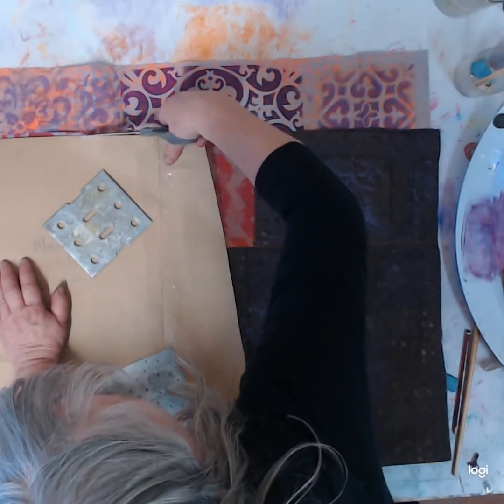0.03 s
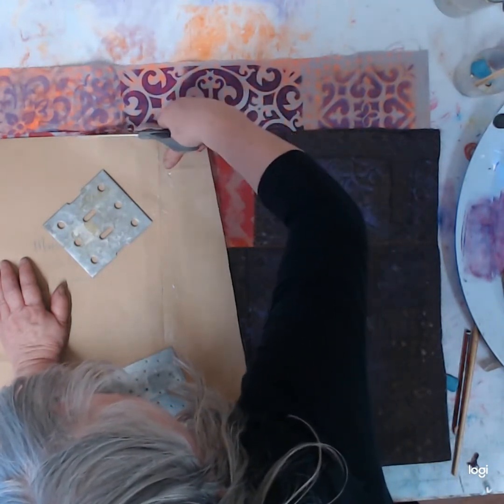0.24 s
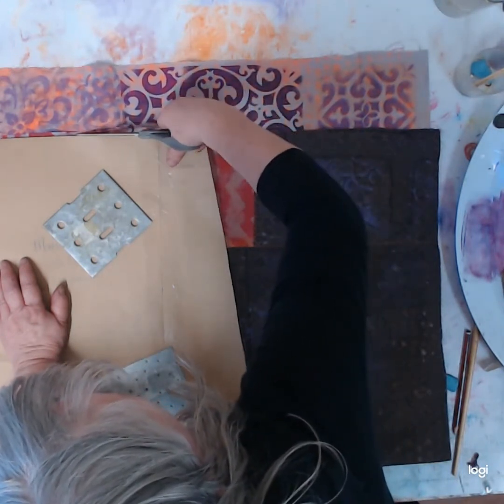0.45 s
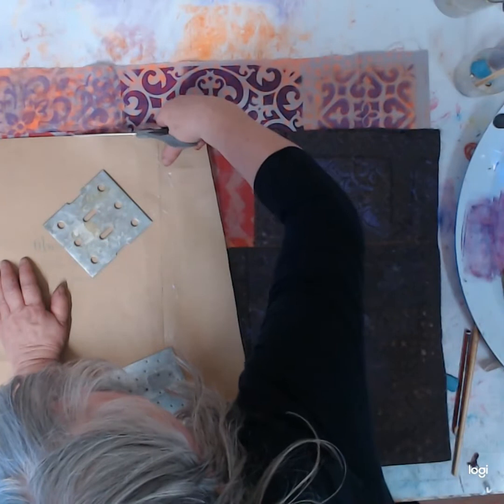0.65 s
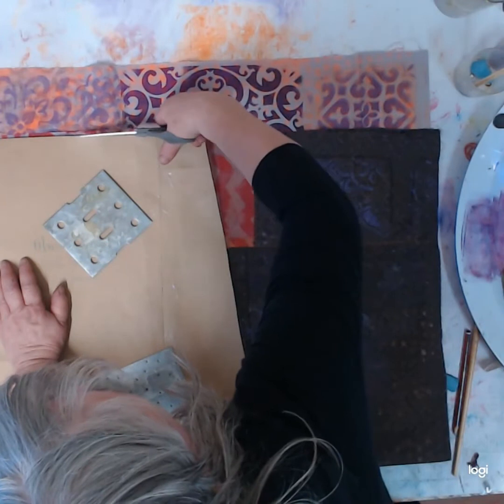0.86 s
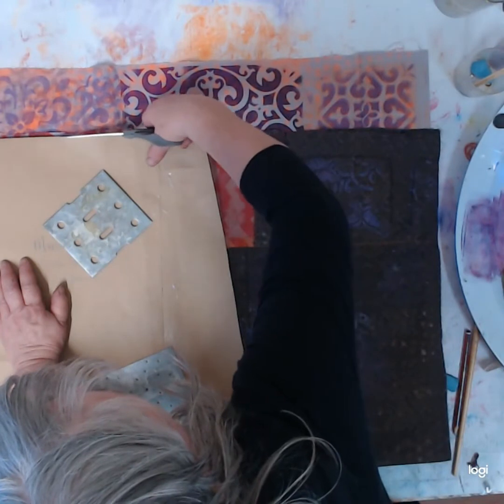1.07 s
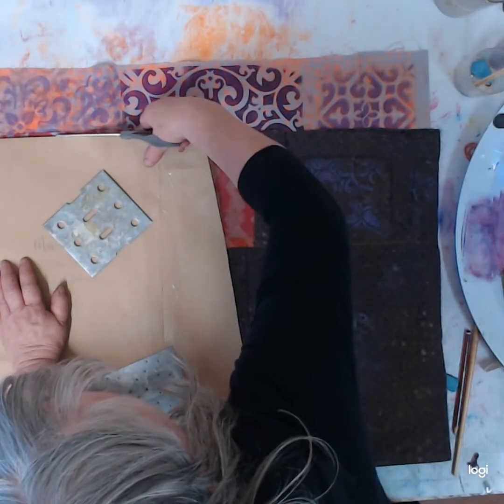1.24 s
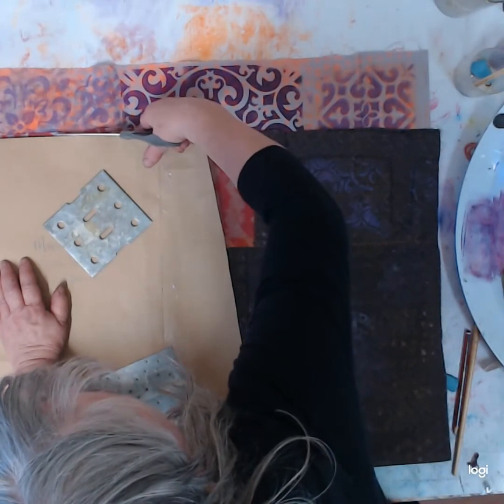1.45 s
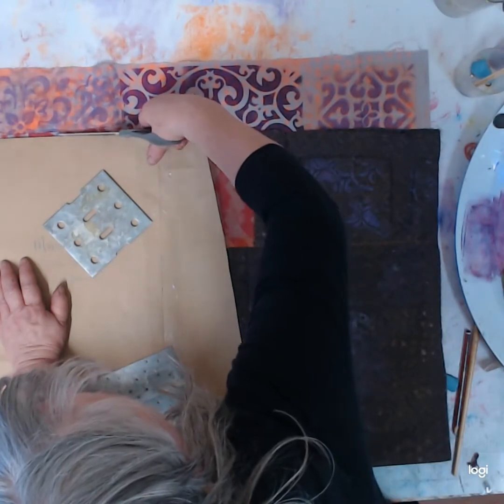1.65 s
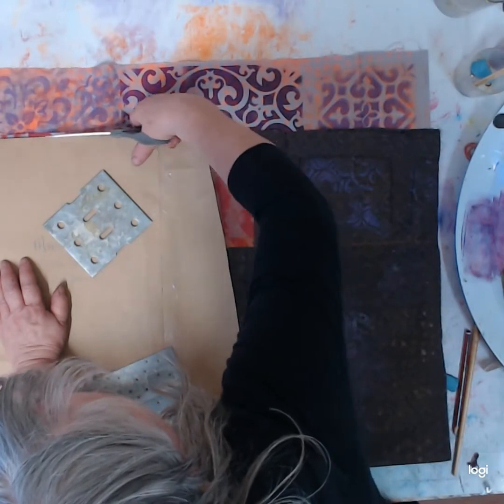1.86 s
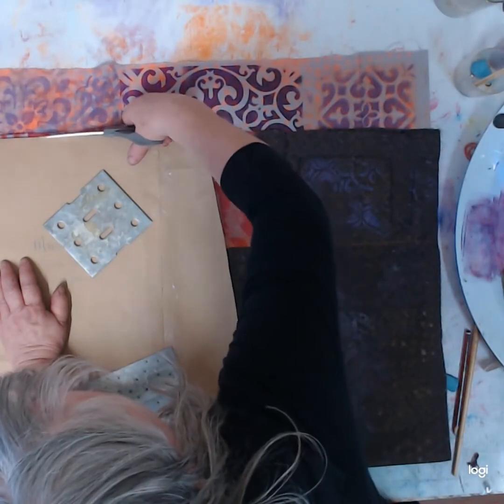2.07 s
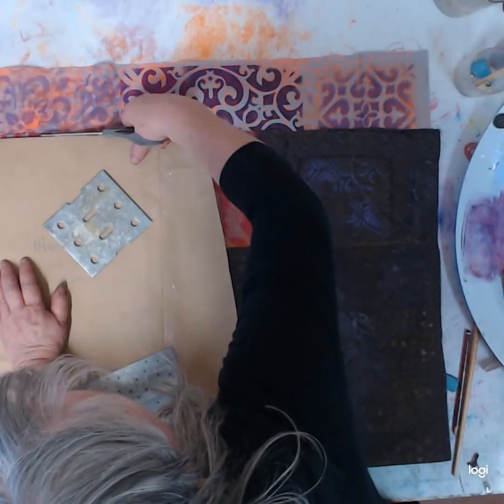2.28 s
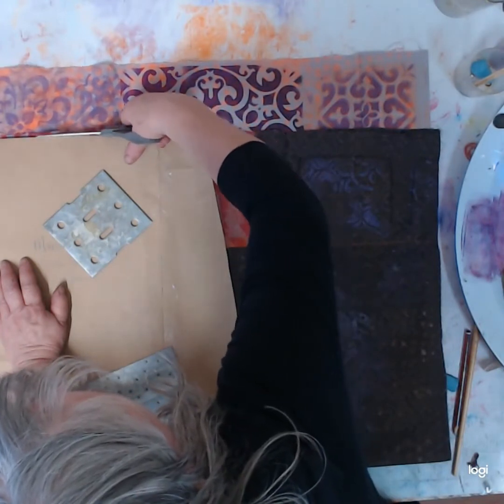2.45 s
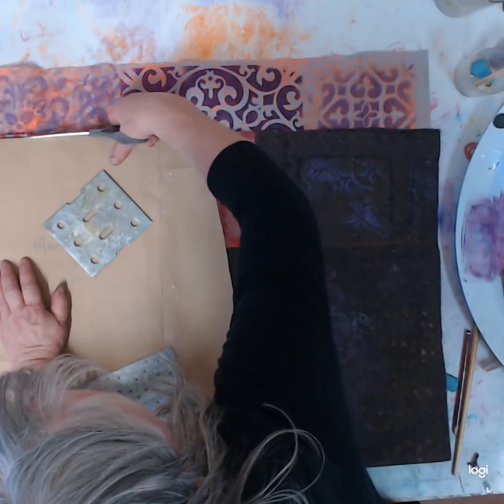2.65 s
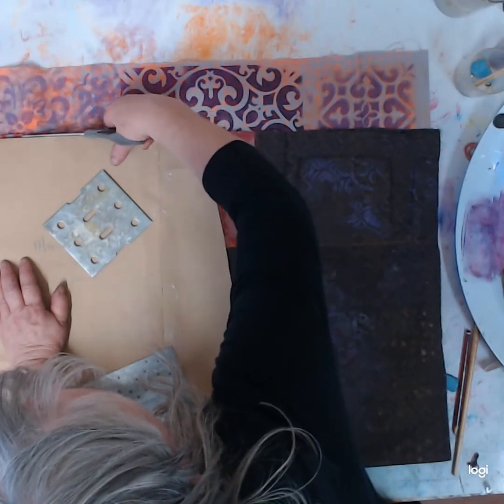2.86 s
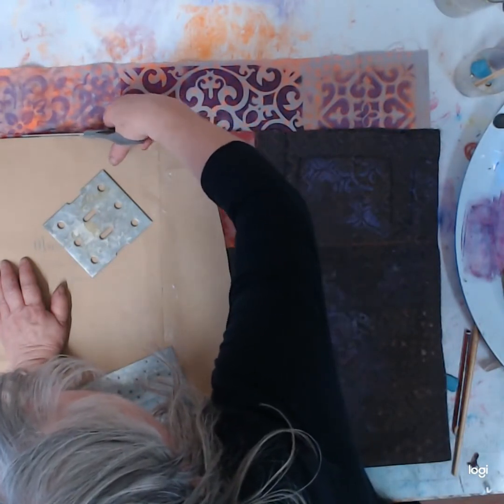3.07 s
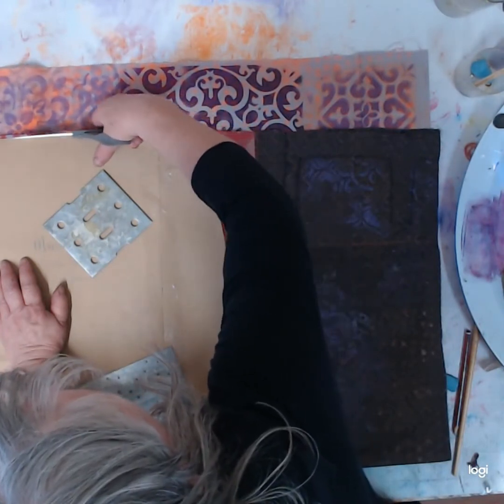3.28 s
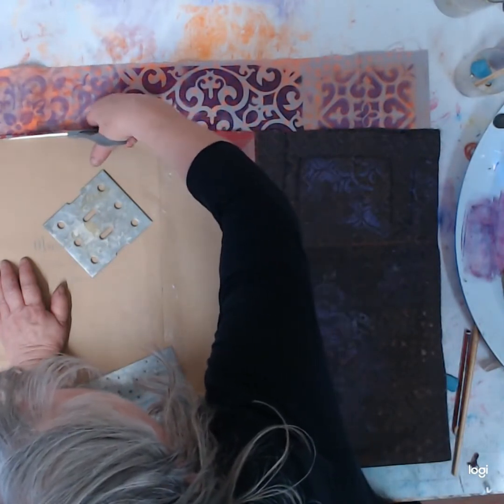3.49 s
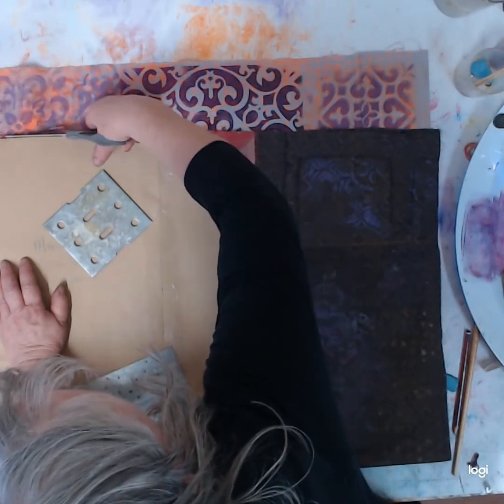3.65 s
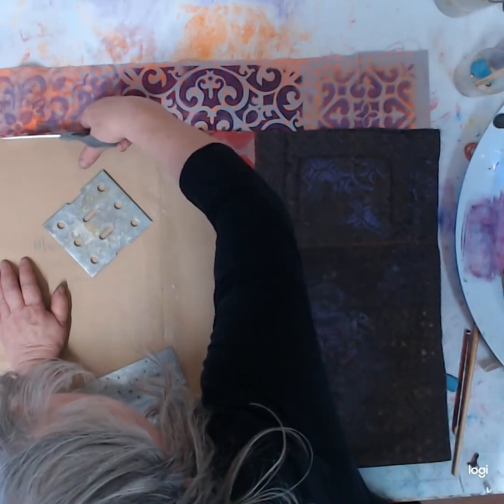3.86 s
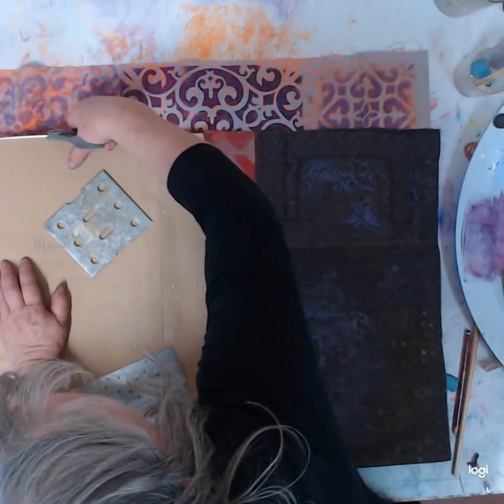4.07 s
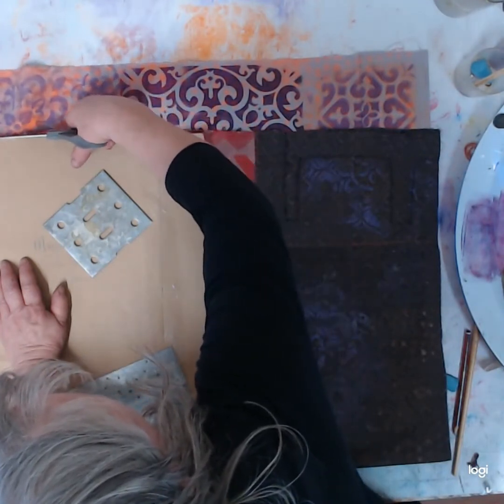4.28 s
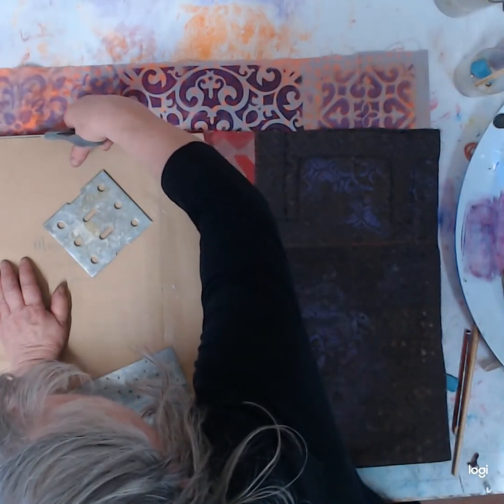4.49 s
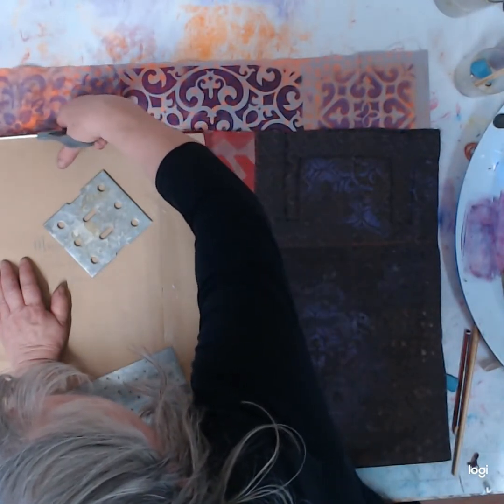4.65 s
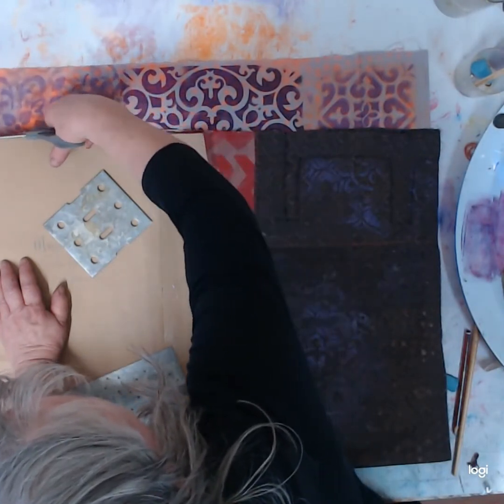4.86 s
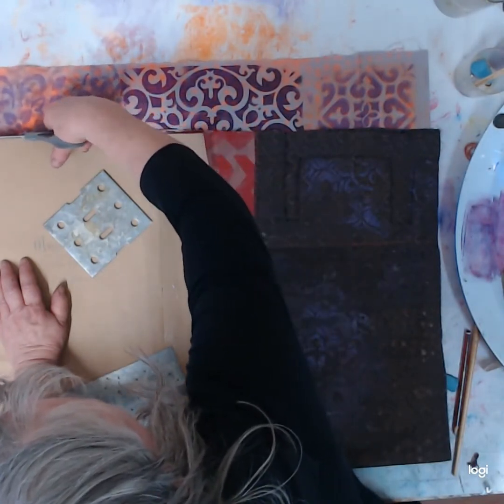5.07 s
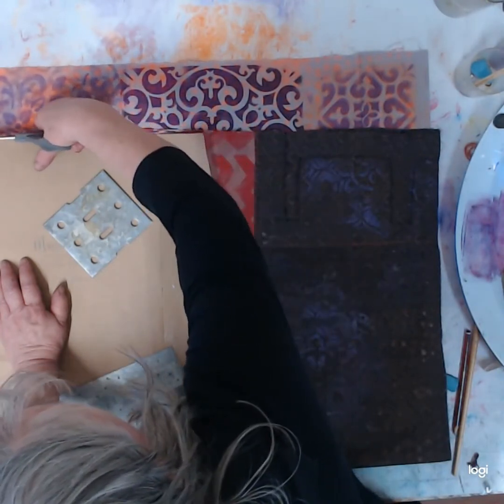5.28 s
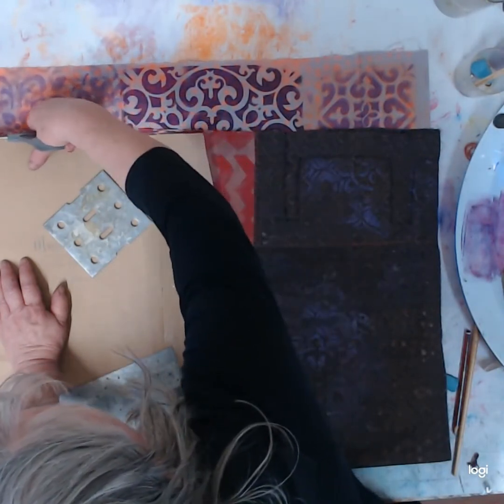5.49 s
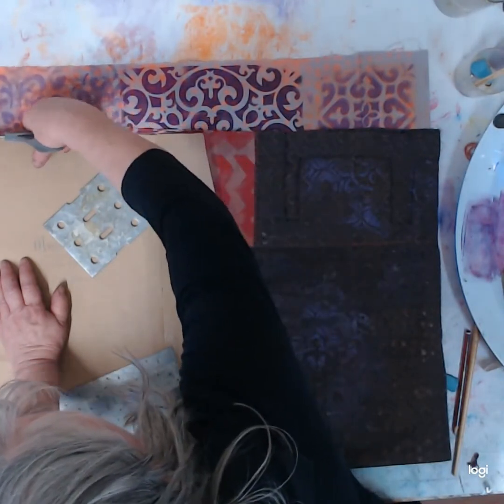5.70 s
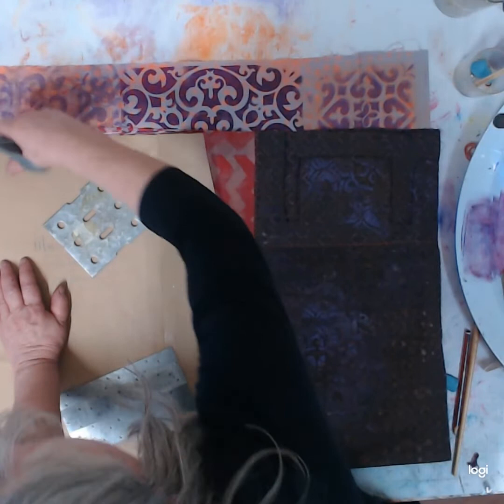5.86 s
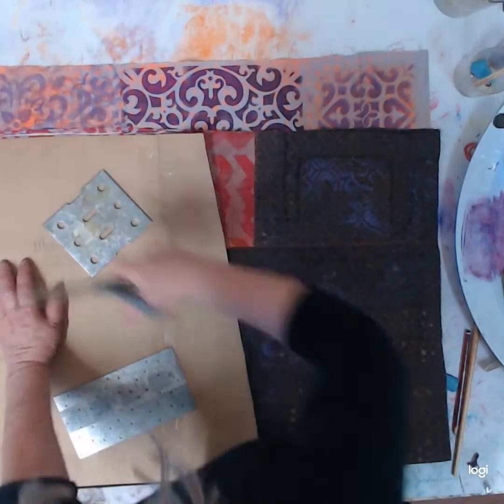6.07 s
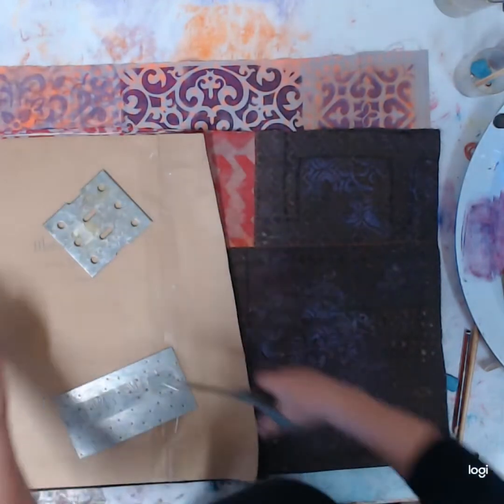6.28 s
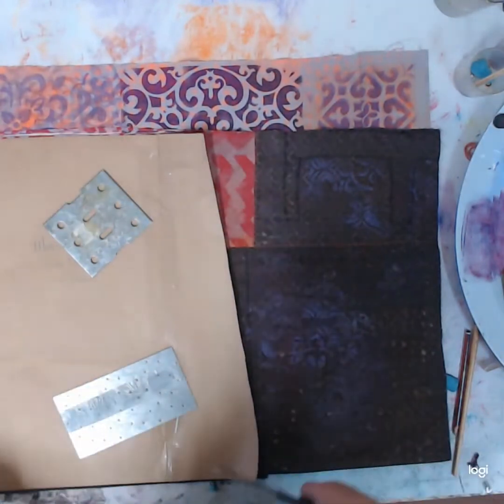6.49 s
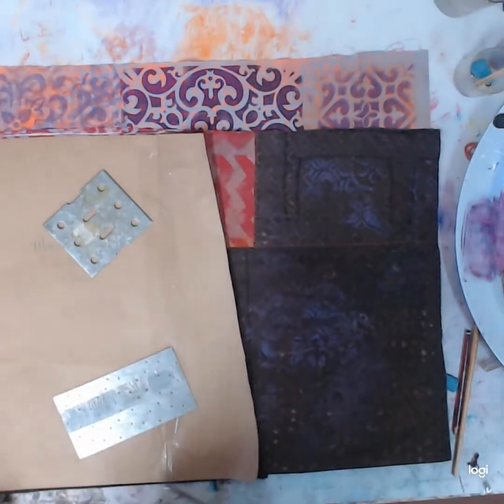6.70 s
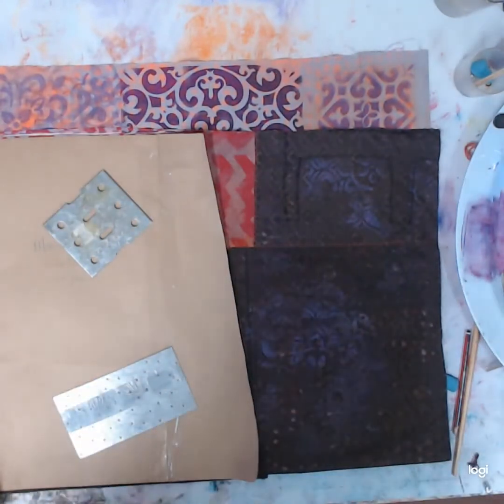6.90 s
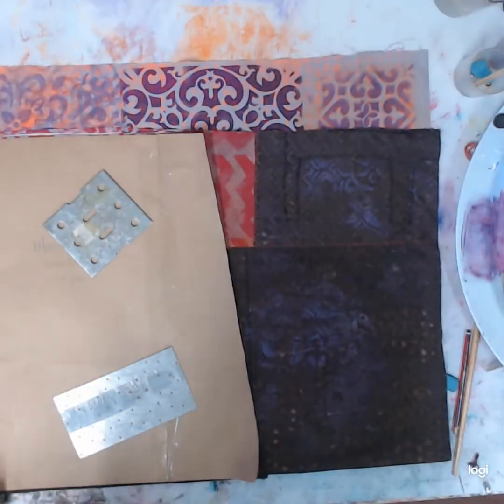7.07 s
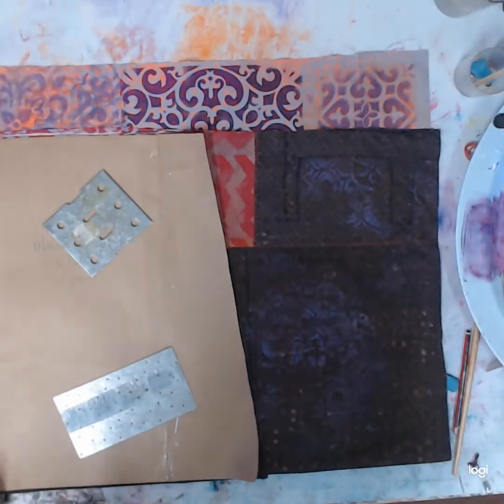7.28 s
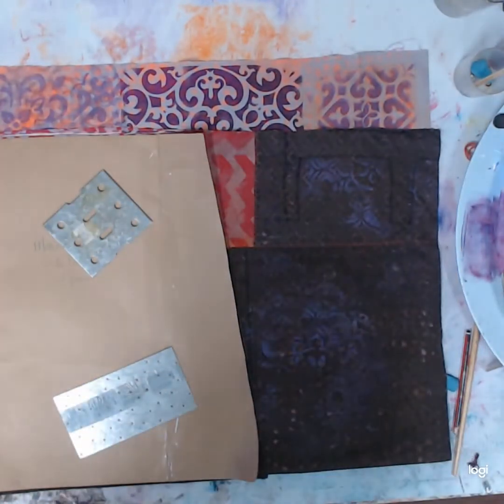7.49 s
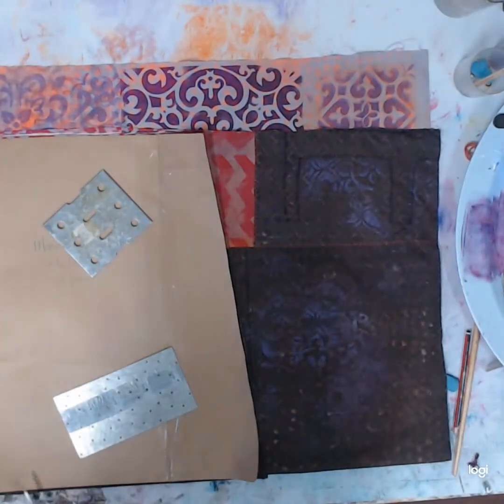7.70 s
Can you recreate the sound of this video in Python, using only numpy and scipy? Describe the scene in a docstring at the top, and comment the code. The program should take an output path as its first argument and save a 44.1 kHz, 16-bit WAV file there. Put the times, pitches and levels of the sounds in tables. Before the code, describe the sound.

Near a worktable in a small room, scissors bite through thick cloth at a slow, even pace, the blades scraping softly as they reopen. Hand and fabric slide faintly over the table, which gives low, muffled thumps under each push. The cutting stops, a movement rustles, then something hard is set down: knocks, brief clatter and dragging, fading to quiet room noise. The microphone is close, with little reverberation.

```python
"""Scissors snip eight times through stiff fabric: bursts of random clicks, a crunch for each bundle of threads,
excite blade resonances, thread fizz and table modes; scuffs follow as the blades open between snips.
Filtered friction noise slides over the table, whose lowest mode swells as decaying and rounded sine tones.
At the end something is set down with knocks and bounces: pushes and rattles drive the modes of table and object.
One early echo, a short diffuse tail and steady room noise surround the work."""
import sys
import numpy as np
from scipy import signal
from scipy.fft import rfft, irfft
from scipy.io import wavfile
from scipy.ndimage import uniform_filter1d

SR = 44100
rng = np.random.default_rng(int(sys.argv[2]) if len(sys.argv) > 2 else 0)


def digitize_waveform(pressure):
    """Quantize a signal to 16-bit integers and store it at the path in sys.argv[1].

    Rows of a 2-D input are taken as channels; values are limited to [-1, 1].
    """
    field = np.atleast_2d(pressure).T
    bounded = np.clip(field, -1, 1)
    quanta = np.round(bounded * 32767).astype(np.int16)
    wavfile.write(sys.argv[1], SR, quanta)


N = 341334
TIME = np.arange(N) / SR

# Levels below are drives or relative gains; filters and the final mix scale them further.
# Room noise spectrum: (frequency [Hz], relative density [dB per Hz])
AIR_SPECTRUM = [(12, -76), (20, -26), (70, -12), (172, -26), (285, -27.5), (718, -19), (849, -27),
                (1330, -25.5), (2200, -28.5), (6010, -56), (16000, -44)]
AIR_DB = -68.5  # rms level
# Reverberation: (frequency [Hz], decay time t60 [s])
ROOM_T60 = [(200, 0.24), (1400, 0.14), (4000, 0.098), (12000, 0.12)]
ROOM_DB = -13
ECHO_S, ECHO_DB = .003045, -6
EDGE_HZ = 15800  # upper band limit

# Slow shaking of the table: (time [s], level [dB])
RUMBLE = [(0, -56), (1.38, -55.5), (2.0, -59.5), (2.3, -56), (3.9, -59.5), (4.1, -54), (5.13, -61.5),
          (5.37, -54.5), (6.2, -55.5), (6.32, -46), (6.5, -63), (6.79, -54), (6.83, -35), (7.15, -38.5),
          (7.24, -47), (7.44, -39.5), (7.56, -52), (7.74, -59)]
# Spectrum of the shaking: (frequency [Hz], relative level [dB])
SHAKING_SPECTRUM = [(12, -22), (22, -18.5), (45, -25), (65, -21.5), (200, -86)]
# Swells of the lowest table mode under the hand's pushes:
# (peak time [s], rise [s], fall [s], level [dB], frequency [Hz])
BOOM_SWELLS = [(.2, 0.083, 0.065, -41, 81), (0.259, 0.019, 0.064, -30, 77), (.37, 0.039, 0.088, -41, 72.2),
               (1.2, 0.022, 0.026, -45, 75.6), (1.33, 0.055, 0.07, -30.5, 79),
               (1.44, .08, 0.078, -35, 69.5), (1.961, 0.046, 0.052, -39.5, 81),
               (2.069, 0.041, .04, -38.5, 70), (2.151, 0.044, 0.083, -42.5, 69.3),
               (2.613, .03, 0.077, -34.5, 93.5), (2.821, 0.067, 0.16, -43.5, 68.3),
               (3.299, 0.018, .05, -41, 88.5), (3.458, 0.13, 0.16, -28, 68.7), (4.069, .04, 0.07, -32, 88),
               (4.165, 0.038, .18, -32.5, 71.2), (4.76, 0.056, 0.014, -32, 75),
               (4.851, 0.025, 0.22, -45, 67.4), (5.298, 0.025, 0.02, -35.5, 88),
               (5.371, 0.015, 0.046, -29.5, 88), (5.441, 0.084, 0.18, -32.5, 69.5),
               (5.93, 0.056, .1, -48.5, 59.8), (6.34, .04, 0.016, -40.5, 68),
               (6.42, 0.048, 0.15, -50.5, 66.5), (6.825, 0.059, 0.044, -21, 67.3),
               (6.93, 0.15, .16, -28, 76)]
BOOM_TAPER = 1.45  # exponent: higher = swells with thinner ends
# A faint second swell peaks AFTER_S after the end of each snip
AFTER_S, AFTER_RISE_S, AFTER_FALL_S, AFTER_HZ = 0.39, 0.36, 0.096, 71.6
# Table top modes: (frequency [Hz], width [Hz], level [dB])
TABLE_MODES = [(105.4, 18, 0.5), (143, 80, -1.5), (210, 38.6, -4.5), (266, 36.5, -6.5), (352.2, 47, -9),
               (389, 52, -8), (543, 128, -1), (749.4, 51, -6), (806, 70, -6.5), (910, 248, -3),
               (1137, 64, -2), (1212, 110, -3.5), (1383, 222, -8.5)]

# Hand, blades and cloth slide over the table:
# (peak time [s], rise [s], fall [s], hiss [dB], fizz [dB], pressure on the table [dB])
SLIDES = [(.38, 0.05, 0.15, -61.5, -72, -61), (.75, 0.26, 0.43, -55, -62.5, -59),
          (1.02, 0.11, 0.042, -60, -71, -56.5), (1.52, 0.063, 0.48, -64, -65, -68),
          (2.3, 0.21, 0.37, -60.5, -65.5, -72), (2.9, 0.16, 0.52, -62.5, -63, -73),
          (3.57, 0.041, 0.22, -61.5, -59, -71), (3.76, 0.17, 0.15, -62.5, -68.5, -81),
          (4.43, 0.46, 0.33, -63, -65, -74), (5.05, 0.34, 0.44, -59.5, -62, -63),
          (5.78, 0.23, 0.45, -65, -65, -65), (5.91, 0.022, 0.035, -61, -54, -67),
          (6.12, 0.083, 0.19, -75, -78, -58.5), (6.32, 0.017, 0.11, -57, -60, -50),
          (6.62, 0.15, 0.39, -73.5, -74.5, -76), (6.775, 0.032, 0.33, -56, -58.5, -42.5),
          (7.01, 0.057, 0.16, -59, -64, -38.5), (7.2, 0.21, 0.32, -64, -68, -51.5),
          (7.42, 0.12, 0.57, -59.5, -61.5, -57), (7.62, 0.23, 0.37, -79, -75, -49.5)]
RESTING_DB = [-74, -74, -64]  # hiss, fizz and pressure of cloth under a still hand
EDGE_DB, SLIDE_TAPER = -19, 1.47  # level one rise before or one fall after the peak; exponent
# Spectrum of friction hiss and small ticks: (frequency [Hz], relative level [dB])
HISS_SPECTRUM = [(1200, -9), (1500, -1.5), (1830, -6.5), (2600, -2.5), (3100, -6.5), (3700, -4),
                 (4900, -4.5), (5900, -7.5), (6700, -7), (8500, -58)]
# Top of soft friction: (frequency [Hz], relative level [dB])
SWISH_SPECTRUM = [(5000, -32), (7000, -1), (8500, -3.5), (10000, -5.5), (13000, -9.5), (16000, -12)]
DRAG_FIZZ_DB, DRAG_FADE_DB_PER_S = -5, 249  # cloth drags along the closing blades, then settles
LEAN_DB, LEAN_RISE_S, LEAN_FALL_S = -44.5, 0.032, .05  # the lower blade leans on the table as a snip starts
LIFT_FADE_DB_PER_S = 168

# Knocks on the table: (time [s], click [dB], then over the click: thud [dB], knock [dB], fizz [dB]; t60 [s])
KNOCKS = [(6.759, -47.5, 18, 13.5, -14, 0.17), (6.7973, -33.5, 11.5, 11, -16, 0.15),
          (6.8883, -50.5, 19, -9, -18, 0.064), (6.9245, -46.5, 20, 17, -16, 0.054),
          (6.9355, -45, 23.5, 12, -26, 0.062), (7.0017, -26, 6, 5, -45, 0.063),
          (7.0284, -40, -13, -17, -33, 0.21), (7.0989, -42, 12, 9.5, -32, 0.088),
          (7.128, -45.5, 22, 19.5, -21, 0.042), (7.1552, -39, 12, -19, -8, 0.027),
          (7.164, -47, 13, -14, -26, 0.06), (7.2674, -55, 26, 19.5, -23, 0.11),
          (7.2784, -41.5, 5, -3, -26, 0.034), (7.5687, -61, 25, 15, 7, 0.071),
          (7.6594, -63.5, 28, -8, -12, 0.03)]
# Click of a knock on wood: (frequency [Hz], relative level [dB])
WOOD_SPECTRUM = [(1200, 1.5), (1500, -3), (1750, -1), (2000, 2.5), (2250, 0.5), (2600, 3.5), (3000, -1),
                 (4100, -3), (4700, -13), (7500, -10.5), (9000, -42)]
# Modes of the thing set down: (frequency [Hz], width [Hz], level [dB])
CLATTER_MODES = [(1000, 65, -3.5), (1228, 35, 3), (2040, 56, -29), (2650, 130, -21), (3340, 62, -19),
                 (3720, 150, -13)]
# Small ticks of blades and paper:
# (time [s], click [dB], then over the click: thud [dB], knock [dB], fizz [dB]; t60 [s])
TICKS = [(0.1097, -58, 1, 1, -15, 0.022), (0.2379, -31.5, 20.5, 11, 2, 0.028),
         (0.2575, -54, 27, 12, -6, 0.018), (0.4013, -38, 8, 4.5, -6, 0.018),
         (0.473, -72, -8, -3, -16, 0.017), (0.5282, -52.5, -19, -19, -3, 0.16),
         (0.9451, -37, -25, -17, -10, 0.027), (0.9668, -46, -27, 4, -7, 0.09),
         (1.1866, -44.5, 22, -3, 4, 0.012), (1.5596, -52, 5, 3, 5, 0.018),
         (2.2412, -44.5, -12, 0, 8, 0.012), (2.4783, -45.5, 8, 9, 4, 0.019),
         (2.5832, -53, 22, 13, -4, 0.034), (2.8221, -45, -17, 0, 5, 0.021), (3.2467, -47, 9, 6, 4, 0.02),
         (3.478, -52, -10, -15, 7.5, 0.023), (4.5491, -51, -20, -1, 3, 0.019),
         (4.8439, -41, 9.5, 4, 1, 0.025), (4.9836, -48.5, -13, -2, -1.5, 0.058),
         (5.0868, -51.5, 12, 13.5, 4, 0.039), (5.4766, -51, 6, -2, -3, 0.11),
         (6.2777, -61, 31.5, -6, 0, 0.042), (6.3134, -47, -12, 0, -18, 0.02),
         (6.3429, -49.5, -8, 5, -5, 0.096), (6.4045, -55.5, -11, 9, 4, 0.032)]

# The blades scuff as they open again:
# (time [s], length before the quick end [ms], knock [dB], blade ring [dB], rub on the table [dB])
OPENINGS = [(0.354, 15, -66, -44.5, -40.5), (1.482, 17, -48.5, -52.5, -44.5),
            (2.17, 25, -39.5, -53.5, -45.5), (2.846, 48, -43, -54.5, -46), (3.546, 40, -46.5, -57, -49),
            (4.27, 62, -46, -55.5, -44.5), (4.91, 89, -50, -54.5, -47)]

# One row a crunch: (time [s], nominal length [ms], blade drive [dB], then over it: knock [dB], fizz [dB])
BITES = [(0.1182, 7.7, -38, 9.5, -8), (.1498, 24, -33, 6.5, -5.5), (0.1797, 15, -32.5, -5, -8),
         (0.201, 7.7, -27, 3.9, -8), (.2272, 42, -64, 15, -1), (0.2525, 6.9, -35, 13, 7),
         (0.276, 6.2, -67, 22, 10), (1.2426, 23, -43.5, 3.5, 1), (1.2636, 4.6, -29, 5.5, -13),
         (1.2727, 19.5, -37, 2.5, -14), (1.296, 7.1, -42.5, 14, -1), (1.3033, 9.7, -26.5, -3, -18),
         (1.33, 15, -27.5, 2.5, -6.5), (1.3517, 29, -53.5, 8.5, -2), (1.941, 17, -45.5, 13.5, 8.5),
         (1.9606, 32.3, -36.5, 8.5, 1.5), (2.0014, 12.8, -25.5, 5, -18), (2.0208, 12, -28.5, 6, -4),
         (2.0424, 3.9, -33, 1, -19), (2.0495, 5.5, -37, 2.5, -7), (2.598, 7.8, -43.5, 20, 4),
         (2.6196, 21.6, -39, 15.5, 7), (2.6492, 9.4, -31.5, 11.5, 0.5), (2.6703, 6.1, -35, 10.5, -7.2),
         (2.6856, 17.6, -27, 4, -14), (2.7164, 8.6, -32.5, 11, -2.5), (2.7367, 7.1, -28, 6.5, -3.5),
         (3.2924, 11, -54, 21.5, 11), (3.308, 12.2, -46.5, 14, 13.5), (3.327, 13.4, -36, 12.5, 1),
         (3.3461, 11.8, -32.5, 9.5, -8), (3.3737, 9.6, -25.5, 4, -10), (3.403, 15.9, -34.5, 6.5, -0.5),
         (4.0294, 13.7, -43, 12.5, 3), (4.05, 9.8, -44.5, 15, 13.5), (4.061, 27.5, -38.5, 7, 3),
         (4.085, 11.5, -29.5, 8, -9), (4.0973, 17, -31.5, 5, 0), (4.1196, 16.6, -31, -0.5, -11),
         (4.1424, 5.4, -29, 11.5, 4.5), (4.1651, 6.2, -26.5, 1, 0.2), (4.188, 10, -44, 9, -27),
         (4.6734, 9.3, -58, 23, 6), (4.684, 5.8, -47.5, 12, 10.5), (4.695, 23.5, -36, 10, 3),
         (4.722, 13.7, -29.5, 6.5, -6), (4.7483, 12.3, -30.5, 7.5, -5), (4.771, 11.1, -28, 3, -2.5),
         (4.792, 5.5, -48, 5, 8), (5.2883, 7.2, -43.5, 14, 7), (5.3024, 17.6, -37, 10, 5.5),
         (5.3273, 17, -29, 4.5, -13), (5.3497, 9.8, -34, 9, 1.5), (5.365, 3.6, -31.5, 12.5, -1)]
# One row a snip: (start [s], end [s], drag [dB], thud over knock [dB], blade ring [Hz],
# after-swell of the table [dB], further blade modes 1 to 4 in this grip [dB each],
# slow table mode [Hz], slow mode level [dB], broad table mode level [dB], first fizz frequency [Hz])
SNIPS = [(0.115, 0.269, -54.5, 1.5, 4800, -65, -38, -20, -7, -20, 353, -29, 2.5, 9500),
         (1.188, 1.352, -54, 0.5, 4880, -53.5, -46, -21, -6, -10.5, 362, -23, -6, 9760),
         (1.939, 2.061, -52, -3, 4950, -62, -20, -34, -9, -14, 355.5, -15, -6, 9800),
         (2.598, 2.747, -49, -6, 4800, -58, -12.5, -31, -8, -14, 387, -17, -5, 9600),
         (3.291, 3.436, -51.5, -7, 4820, -52, -9, -22, -9, -11.5, 360, -13.5, -2.5, 10200),
         (4.0295, 4.193, -50.5, -5.5, 4880, -56, -12.5, -14.5, -9, -12, 388, -15.5, -1, 10540),
         (4.67, 4.803, -57, -4.5, 5340, -62, -14.5, -7, -7.5, -15, 318.5, -12, -5.5, 10800),
         (5.289, 5.363, -51, -2, 5400, -54.5, -39, -9.5, -4, -15, 347.5, -13, -2, 10500)]
# Skirt of the blade ring: (frequency [Hz], relative level [dB])
BLADE_SPECTRUM = [(1200, -37), (1600, -25.5), (2130, -5.5), (3090, -9.5), (4790, 8.5), (6240, 5), (7500, 1),
                  (9000, -17.5)]
# Further blade modes: (frequency [Hz], width of one resonator pass [Hz])
STEEL_MODES = [(4200, 580), (6650, 1050), (8400, 1540), (13400, 5900)]
# Broad fizz of parting threads: (frequency [Hz], relative level [dB])
FIZZ_SPECTRUM = [(5000, -51), (7000, 0), (8000, 20.5), (11000, 14), (14000, -8), (16000, -0.5)]
RING_DB, RING_WIDTH_HZ = -1.5, 850  # main blade ring, width of one resonator pass
FIRST_BITE_PITCH = 0.8  # wide open blades ring lower, as a share of the ring
FIZZ_CLIMB_HZ = 1460  # the fizz climbs as the cut runs from the pivot to the tips


def amp(db):
    """Logarithmic level: decibels become an amplitude ratio."""
    return 10 ** (np.asarray(db) / 20)


def evened(x):
    """Power normalisation: scales to unit rms."""
    return x / np.sqrt(np.mean(x ** 2) + 1e-20)


def read(points, hz):
    """Logarithmic frequency scale: interpolates a table along it."""
    f, value = np.transpose(points)
    return np.interp(np.log(hz + 1), np.log(f + 1), value)


def curve(rows):
    """Linear interpolation in time: every column of a table, sample by sample."""
    s, *columns = np.transpose(rows)
    return [np.interp(TIME, s, c) for c in columns]


def latest(starts):
    """Event succession: index of the event last begun, sample by sample."""
    return np.clip(np.searchsorted(starts, TIME) - 1, 0, None)


def fading(starts, db_per_s):
    """Exponential decay: gain jumps to 1 at each start and dies away."""
    since = TIME - np.asarray(starts)[latest(starts)]
    return amp(-db_per_s * abs(since)) * (since >= 0)


def relative_time(peak, rise, fall):
    """Asymmetric time scale: -1 is one rise before the peak, 1 is one fall after it."""
    since = TIME - peak
    return np.where(since < 0, since / rise, since / fall)


def arch(peak, rise, fall, taper):
    """Cosine-power envelope: a rounded rise and fall around a moment."""
    return abs(np.cos(np.pi / 2 * np.clip(relative_time(peak, rise, fall), -1, 1))) ** taper


def hump(peak, rise, fall):
    """Power-law decibel envelope: a soft rise and fall around a moment."""
    return amp(EDGE_DB * abs(relative_time(peak, rise, fall)) ** SLIDE_TAPER)


def add(mix, s, sound):
    """Superposition: lays a shape into its lanes at a time."""
    part = mix[..., round(s * SR):][..., :sound.shape[-1]]
    part += sound[..., :part.shape[-1]]


def colour(x, points, size=4096):
    """Minimum-phase filtering: a causal spectrum that keeps the power of white noise."""
    log_gain = read(points, abs(np.fft.fftfreq(size, 1 / SR))) * np.log(10) / 20
    response = np.exp(np.conj(signal.hilbert(log_gain)))
    taps = np.fft.ifft(response).real[:size // 2]
    return signal.oaconvolve(x, taps / np.linalg.norm(taps))[:N]


def resonate(x, hz, width):
    """Heterodyned resonance: shifts hz to zero, smooths, shifts back; keeps white-noise power."""
    turn = np.exp(2j * np.pi * np.cumsum(hz * np.ones(N)) / SR)
    r = np.exp(-np.pi * width / SR)
    smooth = signal.lfilter([1], [1, -r], x / turn + 1e-18)
    return np.sqrt(2 * (1 - r * r)) * (turn * smooth).real


def steeply(x, hz, width):
    """Cascaded resonance: two passes give steeper skirts."""
    return resonate(resonate(x, hz, width), hz, width) * np.sqrt(np.pi * width / SR)


def fibres(per_s, spread_db):
    """Random impulse process: snapping fibres as clicks of uneven size."""
    size = amp(spread_db * np.minimum(rng.exponential(1, N), 4)) * rng.standard_normal(N)
    return evened(size * (rng.random(N) < per_s / SR))


def table(thud, knock):
    """Modal vibration: a broad push drives the low modes, a sharp contact those above 500 Hz."""
    t, taps = np.arange(8192) / SR, np.zeros((2, 8192))
    for k, (hz, w, db) in enumerate(TABLE_MODES):
        sense = (-1) ** k  # neighbouring modes swing in opposite senses
        decay = np.exp(-np.pi * w * t)
        taps[int(hz > 500)] += sense * amp(db) * np.sqrt(w) * decay * np.sin(2 * np.pi * hz * t)
    return sum(signal.oaconvolve(f, h / np.linalg.norm(h))[:N] for f, h in zip((thud, knock), taps))


def room_noise():
    """Stationary noise: a steady Gaussian hiss shaped by the room spectrum."""
    return amp(AIR_DB) * evened(colour(rng.standard_normal(N), AIR_SPECTRUM, size=16384))


def room(x):
    """Diffuse reverberation: sparse random taps, each band dying at its own speed."""
    taps = rng.choice([-1., 1.], SR // 2) * (rng.random(SR // 2) < .05)
    taps *= np.arange(SR // 2) > 260  # delay before the tail [samples]
    hz, t, z = signal.stft(taps, SR, nperseg=256)
    tail = signal.istft(z * amp(-60 * t / read(ROOM_T60, hz)[:, None]), SR, nperseg=256)[1]
    return signal.oaconvolve(x, tail / np.linalg.norm(tail))[:N]


def early_echo(x):
    """Phase delay: a linear phase slope shifts the sound by a fraction of a sample as well."""
    return irfft(rfft(x) * np.exp(-2j * np.pi * np.fft.rfftfreq(N, 1 / SR) * ECHO_S), N)


def swell(peak, rise, fall, db, hz):
    """Amplitude modulation: one rounded swell of a low table mode."""
    tone = np.sin(2 * np.pi * hz * (TIME - peak))
    return np.sqrt(2) * amp(db) * arch(peak, rise, fall, BOOM_TAPER) * tone


def boom():
    """Low-mode response: swells under each push and again faintly after each snip, over slow shaking."""
    shaking = evened(colour(rng.standard_normal(N), SHAKING_SPECTRUM, size=32768))
    after = sum(swell(row[1] + AFTER_S, AFTER_RISE_S, AFTER_FALL_S, row[5], AFTER_HZ) for row in SNIPS)
    return sum(swell(*row) for row in BOOM_SWELLS) + after + amp(curve(RUMBLE)[0]) * shaking


def strokes():
    """Friction force: gains of hiss, fizz and table rub from slides, snip drag, and blades leaning and lifting."""
    rows, opens = np.array(SNIPS), np.array(OPENINGS)
    start, end, drag_db = rows[latest(rows[:, 0]), :3].T
    drag = amp(drag_db - DRAG_FADE_DB_PER_S * np.maximum(TIME - end, 0)) * (TIME >= start)
    sliding = sum(amp(row[3:])[:, None] * hump(*row[:3]) for row in SLIDES)
    hiss, fizz, press = sliding + amp(RESTING_DB)[:, None]
    lean = amp(LEAN_DB) * sum(hump(s, LEAN_RISE_S, LEAN_FALL_S) for s in rows[:, 0])
    lift = amp(opens[latest(opens[:, 0]), 4]) * fading(opens[:, 0], LIFT_FADE_DB_PER_S)
    return hiss + drag, fizz + amp(DRAG_FIZZ_DB) * drag, press + lean + lift


def slide():
    """Friction noise: fine clicks that flicker with the weave, in drifting time-frequency patches."""
    hiss_gain, fizz_gain, press = strokes()
    flicker = amp(1.55 * evened(uniform_filter1d(rng.standard_normal(N), 350)))
    z = signal.stft(fibres(12000, 2.17) * flicker, nperseg=512)[2]
    across_bands = uniform_filter1d(rng.standard_normal(z.shape), 7, axis=0)
    patches = evened(uniform_filter1d(across_bands, 12, axis=1))
    rub = evened(signal.istft(z * amp(1.7 * patches), nperseg=512)[1][:N])
    hiss = hiss_gain * colour(rub, HISS_SPECTRUM) + fizz_gain * colour(rub, SWISH_SPECTRUM)
    return hiss + table(0.86 * press * rub, 0.68 * press * rub)


def blows(rows, click, modes=()):
    """Impact excitation: one sharp push on table and struck thing, then a dying rattle with click and fizz."""
    lanes, pushes, t = np.zeros((4, N)), np.zeros((4, N)), np.arange(8000) / SR
    for s, db, thud_db, knock_db, fizz_db, t60 in rows:
        levels = amp(db + np.array([[thud_db], [knock_db], [0], [fizz_db]]))
        decay = amp(-60 * t / max(t60, .005))
        add(lanes, s, levels * decay)
        add(pushes, s, levels * 0.58 * np.linalg.norm(decay))  # one-sample impulse
    rattles = lanes * fibres(14000, 0.26)
    thud, knock, tick, _ = 0.58 * rattles + pushes
    click_force, fizz = rattles[2:] + .4 * pushes[2:]  # the first contact is crisp
    rings = sum(amp(db) * resonate(tick, hz, w) for hz, w, db in modes)
    return table(thud, knock) + colour(click_force, click) + rings + colour(fizz, SWISH_SPECTRUM)


def openings():
    """Sliding contact: steel rubs on steel and table with a sudden start, a short scuff and a quick end."""
    lanes, t, grit = np.zeros((2, N)), np.arange(6000) / SR, fibres(6400, 0.33)
    for s, ms, knock_db, ring_db, _ in OPENINGS:
        attack = np.clip(t / .002, 0, 1)
        decay = amp(-60 * t - 60 * np.maximum(t - ms / 1000, 0) / .04)
        add(lanes, s, amp([[knock_db], [ring_db]]) * attack * decay)
    knock, ring = lanes * grit
    scuff = amp(-1.5) * steeply(knock, 1000, 260) + amp(-5) * steeply(knock, 1260, 160)
    squeak = steeply(ring, 4650, 800) + amp(-17) * steeply(ring, 8600, 600)
    return scuff + squeak


def crunches():
    """Fracture noise: each crunch swells as a bundle of threads is loaded and stops when the last one parts."""
    lanes, t = np.zeros((3, N)), np.arange(3000) / SR
    clumps = amp(1.56 * evened(uniform_filter1d(rng.standard_normal(N), 70)))  # threads part a few at a time
    snaps = fibres(11000, 2.66) * clumps
    for s, ms, db, knock_db, fizz_db in BITES:
        attack = np.clip(t / min(0.29 * ms / 1000, .005), 0, 1)
        shape = attack * amp(-60 * np.maximum(t - 1.007 * ms / 1000, 0) / 0.0028)
        crunch = evened(shape * snaps[round(s * SR):][:len(t)]) * np.sqrt(np.mean(shape ** 2))
        add(lanes, s, amp(db + np.array([[knock_db], [0], [fizz_db]])) * crunch)
    return lanes


def snips():
    """Forced resonance: the crunches drive blades, threads and table, tuned by the place of the cut."""
    knock, ring, fizz = crunches()
    rows, starts = np.array(SNIPS), np.array(BITES)[:, 0]
    settings = rows[latest(rows[:, 0] - .01)].T  # a snip's tuning is ready 10 ms early
    start, end, _, thud_db, ring_hz, _, *reach_db, slow_hz, slow_db, broad_db, wide_hz = settings
    bite_s = starts[latest(starts)]
    along = np.clip((bite_s - start) / (end - start), 0, 1)  # each crunch has its own place on the blade
    ring_hz = ring_hz * np.where(bite_s - start < .01, FIRST_BITE_PITCH, 1)
    thud = amp(thud_db) * knock
    blades = amp(-3.5) * colour(ring, BLADE_SPECTRUM) + amp(RING_DB) * steeply(ring, ring_hz, RING_WIDTH_HZ)
    fizz_hz = wide_hz + FIZZ_CLIMB_HZ * along
    threads = amp(-1.5) * colour(fizz, FIZZ_SPECTRUM) + amp(-3.5) * steeply(fizz, fizz_hz, 1550)
    steel = sum(steeply(amp(db) * (ring + fizz), hz, w) for db, (hz, w) in zip(reach_db, STEEL_MODES))
    local = resonate(amp(slow_db) * thud, slow_hz, 6.0) + steeply(amp(broad_db) * knock, 698.6, 243)
    return table(thud, knock) + local + blades + threads + steel


def scene():
    """Superposition: work on the table, one strong early echo, a little room, boom and room noise."""
    work = snips() + openings() + slide()
    near = work + blows(TICKS, HISS_SPECTRUM) + blows(KNOCKS, WOOD_SPECTRUM, CLATTER_MODES)
    reflected = amp(ECHO_DB) * early_echo(near) + amp(ROOM_DB) * room(near)
    return (amp(-3.15) * near + reflected + boom() + room_noise())[None]


def record(dry):
    """Band limiting: a linear-phase low-pass at the upper limit of the recorder."""
    return signal.oaconvolve(dry, signal.firwin(301, EDGE_HZ, window=("kaiser", 7), fs=SR)[None], "same")


dry = scene()
out = record(dry)
digitize_waveform(out)
```